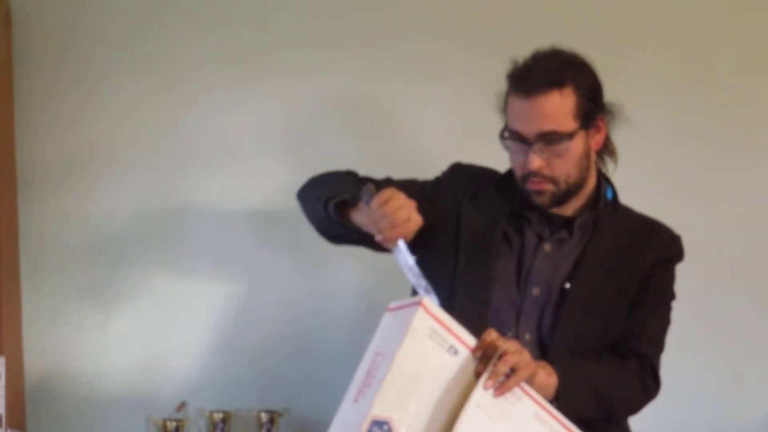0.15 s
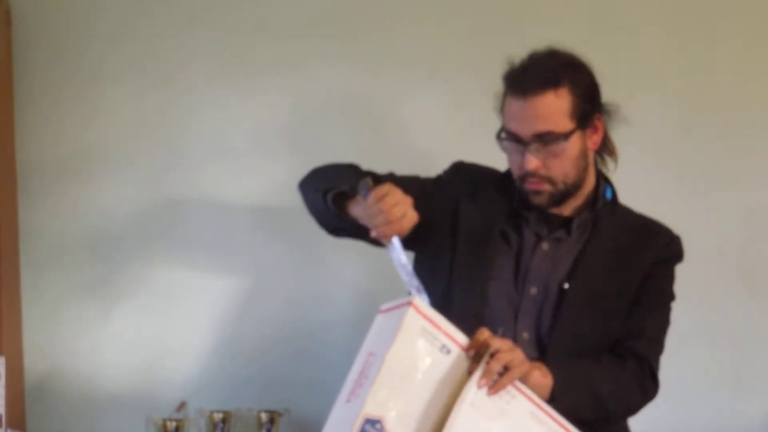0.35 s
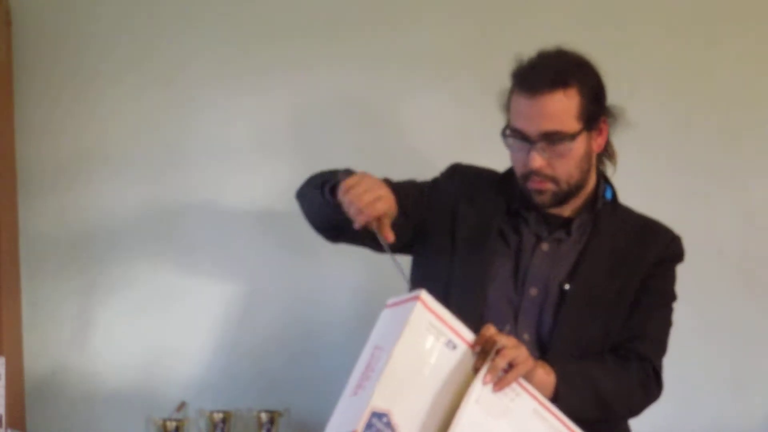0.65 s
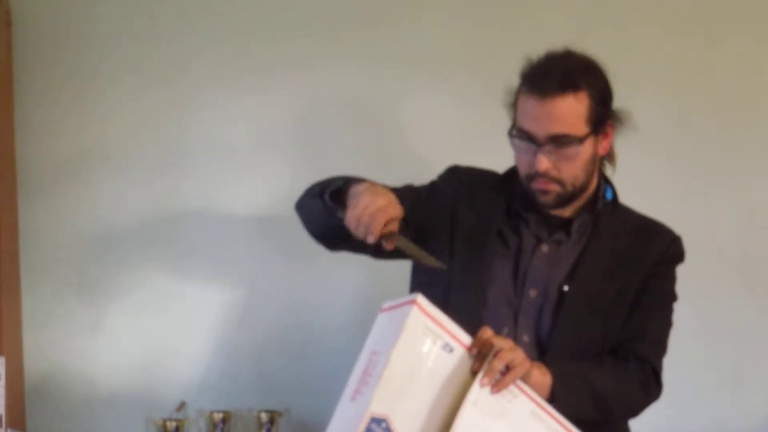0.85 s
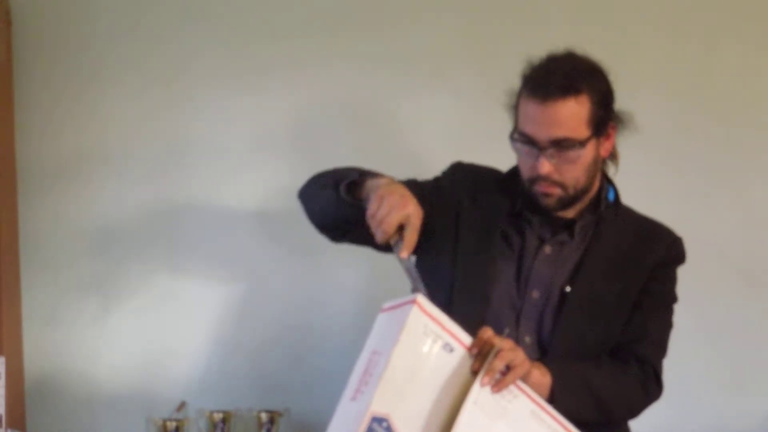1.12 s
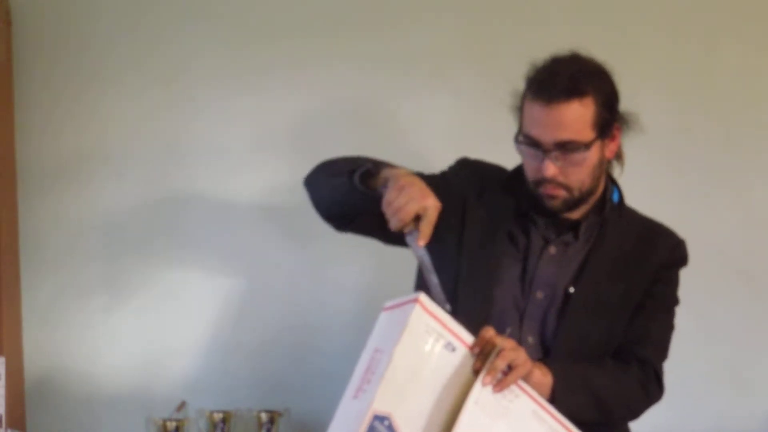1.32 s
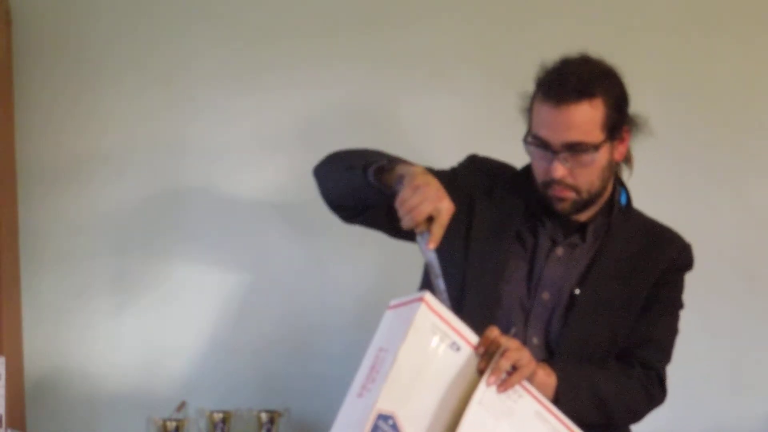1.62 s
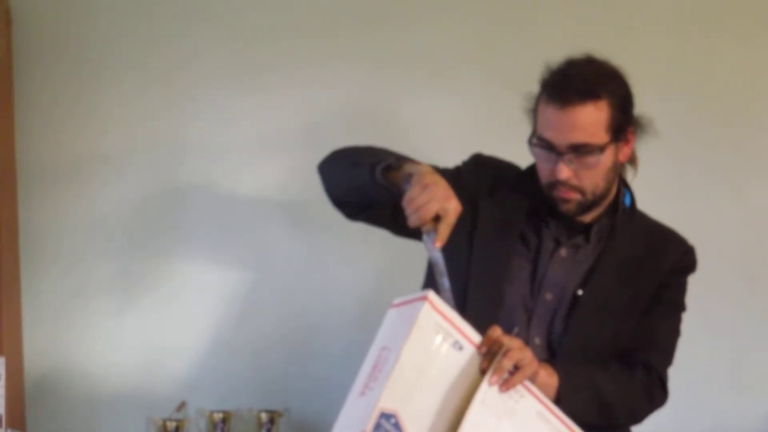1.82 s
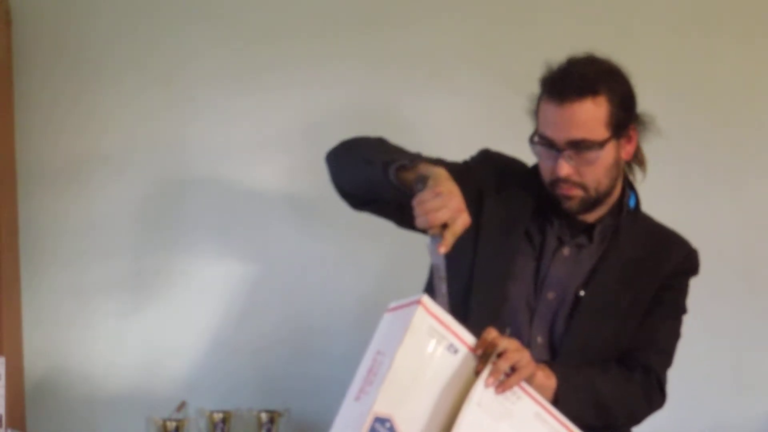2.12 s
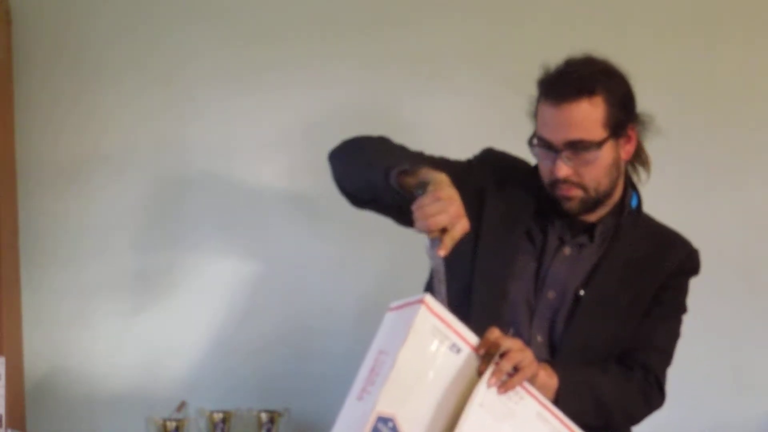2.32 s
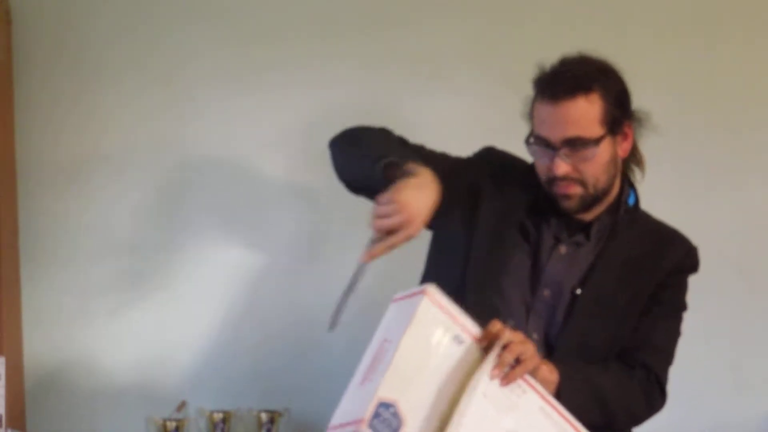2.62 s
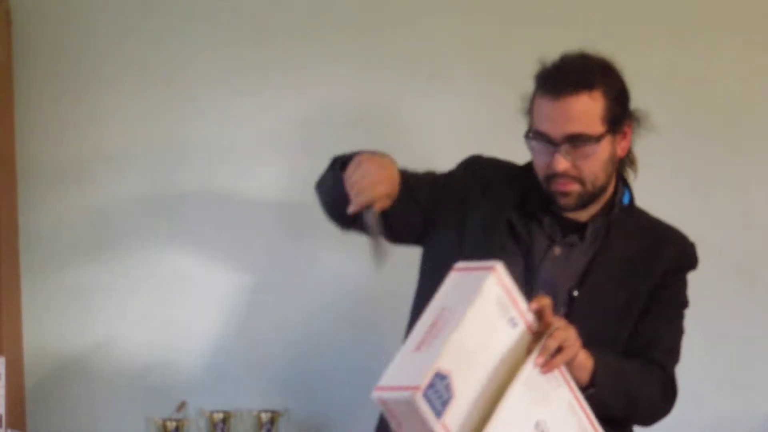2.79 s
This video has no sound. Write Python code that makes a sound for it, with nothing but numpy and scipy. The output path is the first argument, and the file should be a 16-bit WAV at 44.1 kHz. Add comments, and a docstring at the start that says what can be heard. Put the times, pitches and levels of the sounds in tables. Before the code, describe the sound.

A knife cuts through a taped cardboard box in short, scraping pushes.

```python
"""A kitchen knife is worked through the taped seam of a cardboard box in a small, quiet room.
Each push of the blade snaps fibres (a rasp), rubs on tape and card (a bright hiss) and drums the
hollow box. Tape pops, the paper facing tears and the box wall puffs air as it flexes.
The cut edge judders after the first cut; the blade taps the box as it is set again,
and finally rips through and out."""
import sys
import numpy as np
from scipy import signal
from scipy.fft import rfft, irfft
from scipy.io import wavfile
from scipy.ndimage import uniform_filter1d

SR = 44100
rng = np.random.default_rng(int(sys.argv[2]) if len(sys.argv) > 2 else 0)


def dump(signal):
    """Clip the signal to [-1, 1] and save it as 16-bit WAV at the path in sys.argv[1]."""
    limited = np.clip(np.atleast_2d(signal).T, -1, 1)
    pcm = np.round(limited * 32767).astype(np.int16)
    wavfile.write(sys.argv[1], SR, pcm)


N = 130095
TIME = np.arange(N) / SR
RELEASE_S = 0.012  # die-away of a push or a tear
HIT_GAIN = np.sqrt(0.0088 * SR)  # a knock's or pop's level is its energy spread over 8.8 ms

# Bright tone of steel on tape and card. Each row: frequency in Hz, level in dB.
TAPE_TONE = [(500, -31), (3000, -26.5), (5500, -16.5), (7500, -10.5), (9300, -4.5), (10900, -1),
             (12200, 0.5), (13300, -12), (14300, -1.5)]


def amp(db):
    """Decibels to gain."""
    return 10 ** (np.asarray(db) / 20)


def unit(x):
    """Scales to rms 1."""
    return x / np.sqrt(np.mean(x ** 2) + 1e-20)


def unit_energy(x):
    """Scales each channel to energy 1."""
    return x / np.sqrt(np.sum(x ** 2, -1, keepdims=True) + 1e-20)


def curve(points, hz):
    """Reads a table on a log-frequency axis."""
    f, value = np.transpose(points)
    return np.interp(np.log(hz + 1), np.log(f + 1), value)


def add(mix, s, sound):
    """Mixes a sound in at s seconds."""
    part = mix[max(round(s * SR), 0):][:len(sound)]
    part += sound[:len(part)]


def through(x, response):
    """Passes a signal through a response."""
    return signal.fftconvolve(x, response)[:len(x)]


def colour(points, size=2048):
    """A minimum-phase click with the given tone, for use as an EQ."""
    log_gain = np.log(amp(curve(points, abs(np.fft.fftfreq(size, 1 / SR)))))
    spectrum = np.exp(np.conj(signal.hilbert(log_gain)))
    return unit_energy(np.fft.ifft(spectrum).real[:size // 2])


def mode(hz, t60):
    """One resonance, dying by 60 dB in t60 seconds."""
    t = np.arange(SR // 2) / SR
    return np.sin(2 * np.pi * hz * t) * np.exp(-np.log(1000) * t / t60)


def paired(spectra, likeness):
    """Blends two unrelated spectra into a partly alike left and right."""
    likeness = np.clip(likeness, -1, 1)
    mid = np.sqrt((1 + likeness) / 2) * spectra[0]
    side = np.sqrt((1 - likeness) / 2) * spectra[1]
    return np.array([mid + side, mid - side])


def envelope(start, rise, length):
    """Rise, hold and release of one push or tear."""
    release = np.exp(-np.maximum(TIME - start - length, 0) / RELEASE_S)
    return np.clip((TIME - start) / rise, 0, 1) * release


def room(x, wet_db, pan_db, early_db=1.5):
    """Direct sound, quick reflections off box and body, and a short tail; positive pan is left."""
    # Room decay. Each row: frequency in Hz, seconds to fall 60 dB.
    decay = [(150, 1), (500, 0.61), (2000, 0.32), (6000, 0.29), (14000, 0.35)]
    # Reverb width. Each row: frequency in Hz, left-right correlation.
    likeness = [(100, 0.08), (600, 1), (1500, 0.99), (3000, 1), (6000, 0.5), (9000, 0.38), (14000, -0.28)]
    hz, t, noise = signal.stft(rng.standard_normal((2, SR // 2)), SR, nperseg=256)
    noise = paired(noise, curve(likeness, hz)[:, None])
    tail = np.exp(-np.log(1000) * t / curve(decay, hz)[:, None])
    early = amp(early_db) * np.exp(-t / 0.0053)
    response = amp(wet_db) * unit_energy(signal.istft(noise * (tail + early), SR, nperseg=256)[1])
    response[:, 0] += 1  # direct sound
    return amp([[pan_db], [-pan_db]]) * np.array([through(x, side) for side in unit_energy(response)])


def moving(x, wet_db, pan_db, early_db=1.5, count=7, step_s=0.05):
    """The blade moves, so its sound fades from one set of reflections to the next."""
    distances = [abs((TIME / step_s - k) % count - count / 2) for k in range(count)]
    fades = [np.cos(np.pi / 2 * np.minimum(d, 1)) for d in distances]
    return sum(room(x * fade, wet_db, pan_db, early_db) for fade in fades)


def room_tone(level_db=-51, pan_db=-0.5):
    """Steady rumble and hiss of the quiet room."""
    # Tone of the still room. Each row: frequency in Hz, relative level in dB.
    tone = [(12, -45), (20, -7), (48, 0), (77, -3), (122, -9.5), (156, -9), (195, -10.5), (443, -13),
            (668, -17), (745, -14.5), (809, -16.5), (1220, -19), (14000, -27.5)]
    # Its width. Each row: frequency in Hz, left-right correlation.
    likeness = [(60, 0.77), (180, 0.65), (530, 0.33), (1580, 0.18), (4710, 0), (14000, 0.17)]
    hz = np.fft.rfftfreq(N, 1 / SR)
    noise = paired(rfft(rng.standard_normal((2, N))), curve(likeness, hz))
    return amp(level_db) * amp([[pan_db], [-pan_db]]) * unit(irfft(noise * amp(curve(tone, hz)), N))


def fibres(snaps_per_s=1900, spread_db=4.5, rub_gain=0.38, bunch_hz=123, bunch_db=0.5):
    """Fibres give way in bunches: snaps of uneven size over smooth rubbing."""
    sizes = amp(spread_db * np.minimum(rng.exponential(1, N), 4))
    snaps = sizes * rng.choice([-1, 1], N) * (rng.random(N) < snaps_per_s / SR)
    hz = np.fft.rfftfreq(N, 1 / SR)
    bunches = unit(irfft(rfft(rng.standard_normal(N)) / (1 + (hz / bunch_hz) ** 4), N))
    grain = (unit(snaps) + rub_gain * rng.standard_normal(N)) * amp(bunch_db * bunches)
    return grain / np.sqrt(uniform_filter1d(grain ** 2, size=900) + 1e-9)  # levelled over 20 ms


def blade_strokes():
    """Each push of the blade drives one fibre grain into three layers: drumming, rasp and hiss."""
    # Pushes. Each row: start, rise and length in seconds, then drumming, rasp and hiss levels in dB.
    strokes = [ (0.007, 0.016, 0.065, -58, -59.5, -70), (0.07, 0.026, 0.044, -40, -40.5, -35),
               (0.103, 0.0095, 0.014, -32, -34, -23.5), (0.119, 0.017, 0.072, -32, -38, -34.5),
               (0.176, 0.035, 0.05, -40, -51, -50), (0.204, .01, 0.049, -56, -52.5, -59),
               (0.332, 0.028, 0.055, -48.5, -51.5, -42), (0.369, 0.012, 0.069, -42.5, -50.5, -47.5),
               (0.612, 0.013, 0.062, -50.5, -56.5, -56), (0.89, .02, 0.035, -89, -69, -52.5),
               (1.146, 0.014, 0.042, -59.5, -56, -55), (1.198, 0.018, 0.044, -79, -66, -56),
               (1.316, .01, 0.044, -49, -54, -49.5), (2.106, .012, .064, -50.5, -52.5, -51),
               (2.17, 0.02, 0.024, -34.5, -38.5, -36.5), (2.195, 0.0057, 0.031, -49, -49.5, -43.5),
               (2.346, 0.016, 0.052, -52.5, -51, -47.5), (2.408, 0.01, 0.046, -43, -44, -37.5),
               (2.453, 0.023, 0.081, -48, -48.5, -44), (2.533, 0.018, 0.055, -42, -42, -36),
               (2.587, .011, 0.034, -32, -33.5, -29.5), (2.63, 0.017, 0.03, -29, -30.5, -22.5),
               (2.676, 0.0074, 0.046, -38.5, -45, -54), (2.726, .01, .055, -52, -51, -60),
               (2.76, 0.027, 0.073, -65, -59, -48.5), (2.816, 0.0087, 0.093, -57, -51.5, -44.5),
               (2.905, 0.028, 0.06, -48, -51, -52)]
    power = np.zeros((3, N))
    for start, rise, length, *levels_db in strokes:
        power += (amp(levels_db)[:, None] * envelope(start, rise, length)) ** 2
    return np.sqrt(power) * fibres()


def box_response():
    """Damped card panels heard through the room, plus the ringing modes of the hollow box."""
    # Pitches of the box's modes in Hz.
    pitches = [186, 229, 268, 339, 394, 438, 493, 549, 574, 691, 757, 855]
    # The same modes in order. Each row: relative level in dB, seconds to fall 60 dB.
    rings = [(-7, 0.23), (-1, 0.18), (1, 0.2), (-11, 0.053), (-3.5, 0.25), (0.5, 0.2), (-6, 0.32),
             (2.5, 0.17), (-9, 0.45), (-7.5, 0.24), (-5.5, 0.23), (-5, 0.22)]
    # Dull tone of the card panels. Each row: frequency in Hz, level in dB.
    panel_tone = [(40, -65), (130, -26.5), (210, -8.5), (320, -8), (520, 2), (700, -4.5), (1000, -7.5),
                  (1800, -30.5), (6000, -73)]
    ring = sum((-1) ** k * amp(db) * mode(hz, t60)
               for k, (hz, (db, t60)) in enumerate(zip(pitches, rings)))
    panel = np.zeros(len(ring))
    add(panel, 0, colour(panel_tone))
    both = amp(0.5) * unit_energy(ring) + amp(-0.5) * room(panel, wet_db=-8, pan_db=-0.46)
    return unit_energy(both.ravel()).reshape(both.shape) * np.sqrt(2)


def rasp(drive):
    """The dry midrange bite of card snapping at the blade."""
    # Tone of the rasp. Each row: frequency in Hz, level in dB.
    tone = [(100, -38), (500, -8), (900, -1), (1350, 0), (1800, 0), (2400, -2), (3000, -1.5), (4000, -5),
            (7000, -10), (14000, -20)]
    return moving(through(drive, colour(tone)), wet_db=6.5, pan_db=-0.33)


def hiss(drive):
    """The blade rubs on tape and card; the hiss glances off the box and the cutter's chest."""
    return moving(through(drive, colour(TAPE_TONE)), wet_db=10, pan_db=-1.85, early_db=6.5)


def tape_pops(decay_s=0.0006):
    """Tape gives under the point of the blade with tiny bright cracks."""
    # Pops. Each row: time in seconds, level in dB.
    pops = [(.1098, -33), (.118, -24), (2.6442, -38), (2.6598, -35)]
    cracks, t = np.zeros(N), np.arange(300) / SR
    for start, db in pops:
        burst = rng.standard_normal(len(t)) * np.exp(-t / decay_s)
        add(cracks, start, amp(db) * unit_energy(through(burst, colour(TAPE_TONE))))
    return room(HIT_GAIN * cracks, wet_db=-2, pan_db=0.8)


def blade_knocks(box, tick_ms=6.8):
    """The blade knocks the box with a thud and a tick; a longer contact gives a deeper thud."""
    # Knocks. Each row: time in seconds, thud level in dB, tick level in dB, contact in milliseconds.
    knocks = [ (0.119, -30.5, -52, 0.9), (.173, -37, -42, 0.95), (0.186, -32, -59, 2.9),
              (0.423, -41.5, -61, 0.3), (.655, -51.5, -54.5, 0.52), (1.1464, -51.5, -48, 0.32),
              (1.179, -56, -52, 0.49), (1.334, -63, -47.5, 0.32), (1.356, -51, -66, 1.1),
              (2.092, -50, -45.5, 0.1), (2.1966, -36.5, -41, 0.37), (2.444, -49, -50, 1.8),
              (2.612, -38, -40, 0.16), (2.644, -46, -55, 0.25), (2.679, -28.5, -53, 2.5),
              (2.690, -41, -49, 2.4), (2.704, -32, -55, 0.62)]
    thuds, ticks = np.zeros((2, N))
    t_ms = np.arange(400) * 1000 / SR
    for start, thud_db, tick_db, contact_ms in knocks:
        force = t_ms * np.exp(-2 * t_ms / contact_ms)
        add(thuds, start, amp(thud_db) * force / np.linalg.norm(through(box.mean(0), force)))
        tick = rng.standard_normal(len(t_ms)) * np.exp(-t_ms / tick_ms)
        add(ticks, start, amp(tick_db) * unit_energy(tick))
    return HIT_GAIN * thuds, HIT_GAIN * ticks


def paper_tears(rise_s=0.012):
    """The paper facing rips in short runs of snapping fibres."""
    # Rips. Each row: start in seconds, length in seconds, level in dB.
    tears = [(0.12, 0.0089, -47), (0.344, 0.027, -53.5), (1.318, 0.029, -47.5), (2.599, 0.037, -36.5),
             (2.636, 0.047, -31.5), (2.828, .11, -52)]
    # Crisp tone of tearing paper. Each row: frequency in Hz, level in dB.
    tone = [(1000, -24), (3000, -10), (4200, -5.5), (6000, -3), (8500, -5), (11000, -2.5), (14000, -6)]
    level = sum(amp(db) * envelope(start, rise_s, length) for start, length, db in tears)
    return moving(through(level * fibres(), colour(tone)), wet_db=8.5, pan_db=-1.7)


def lid_judder():
    """The cut edge catches and lets go; each slip clacks the lid and leaves it ringing."""
    # Slips. Each row: time in seconds, level in dB.
    slips = [(.13, -33), (0.1949, -27), (.210, -28), (0.2283, -30), (.2475, -30.5), (.258, -39),
             (.277, -33.5), (.296, -41), (2.2, -38), (2.246, -71), (2.275, -42)]
    clack = mode(hz=513, t60=0.056)
    ring = amp(-10) * mode(hz=482, t60=0.36)
    judder = np.zeros(N)
    for start, db in slips:
        add(judder, start, amp(db) * (clack + ring))
    return judder


def wall_puffs():
    """The box wall flexes under the hand and pumps out soft, deep puffs of air."""
    # Flexes. Each row: start in seconds, length in seconds, level in dB.
    flexes = [(0.13, 0.15, -47), (2.646, 0.078, -47)]
    # Bassy tone of a puff. Each row: frequency in Hz, level in dB.
    tone = [(30, -10), (55, -7), (78, -1), (110, -15), (170, -4.5), (260, -20), (500, -32)]
    level = sum(amp(db) * np.sin(np.pi * np.clip((TIME - start) / length, 0, 1))
                for start, length, db in flexes)
    return level * unit(through(rng.standard_normal(N), colour(tone, size=8192)))


def scene():
    """Strokes and knocks sound the box and the blade; tears, pops, puffs and room tone join them."""
    drumming, snapping, rubbing = blade_strokes()
    box = box_response()
    thuds, ticks = blade_knocks(box)
    body = np.array([through(drumming + thuds, side) for side in box]) + lid_judder()
    low_cut = signal.butter(4, 159, "high", fs=SR, output="sos")  # the body's sound is cut below about 160 Hz
    cutting = signal.sosfilt(low_cut, body) + rasp(snapping + ticks) + hiss(rubbing)
    return cutting + paper_tears() + tape_pops() + wall_puffs() + room_tone()


def record(dry):
    """A steep high cut takes the very top off the mix."""
    high_cut = signal.firwin(601, cutoff=14270, window=("kaiser", 9), fs=SR)
    return signal.oaconvolve(dry, high_cut[None], "same")


dry = scene()
out = record(dry)
dump(out)
```